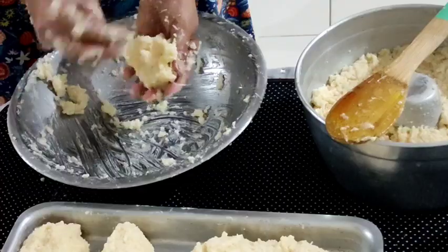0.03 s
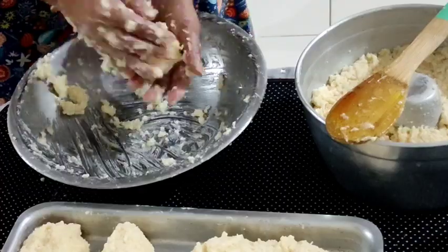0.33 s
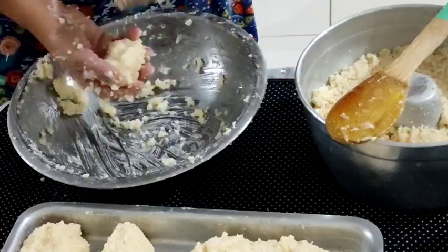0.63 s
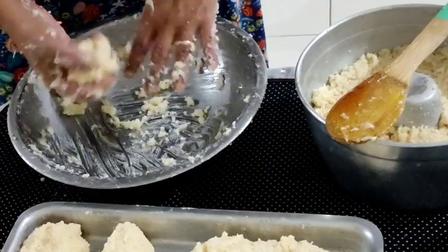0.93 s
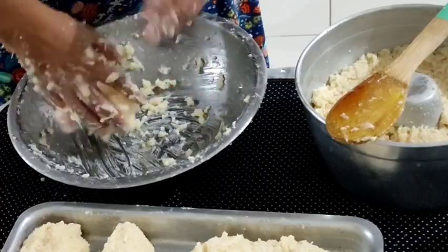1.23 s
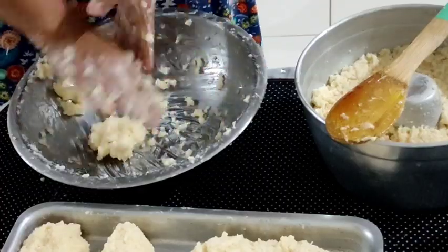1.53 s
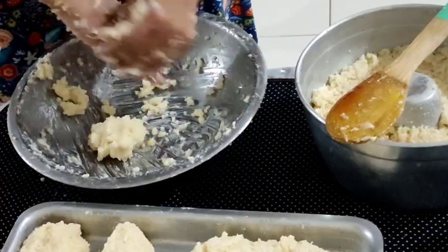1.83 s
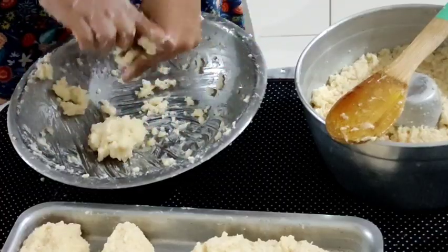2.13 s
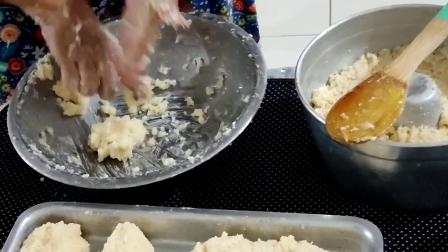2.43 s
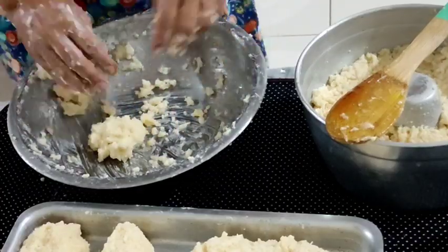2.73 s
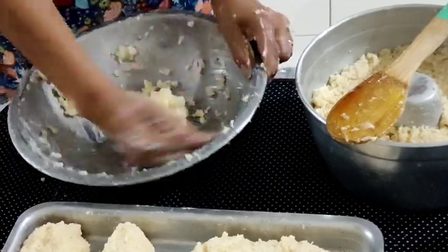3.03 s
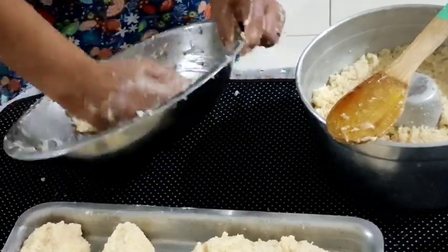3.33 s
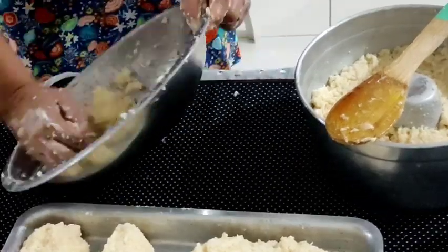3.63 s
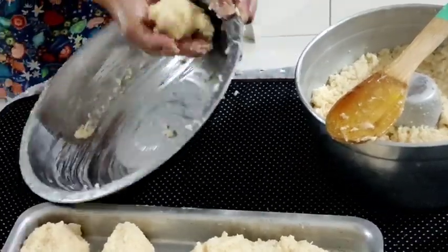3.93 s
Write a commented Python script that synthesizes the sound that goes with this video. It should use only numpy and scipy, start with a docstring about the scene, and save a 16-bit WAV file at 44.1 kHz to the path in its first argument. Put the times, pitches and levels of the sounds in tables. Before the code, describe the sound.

Sticky dough peels off hands in faint, crisp, wet ticks throughout, close up, with a few soft pats on a metal bowl. The rim clinks sharply at about 1.8 seconds. At 2.7 seconds a lump slaps in and squelches, ringing the metal briefly. Around 3 seconds the bowl drags and tips with a dull knock, then fingers wipe it until the end. An appliance hums steadily in the quiet kitchen.

```python
"""Sticky dough crackles off the skin over an appliance's hum, close to a stereo pair in a quiet kitchen.
Threads of dough part in tiny ticks; fingers wipe, pat and skid on a metal bowl, and its rim clinks once.
A lump slaps in, squelches flat and sets the metal ringing. The bowl is dragged and tipped up with a soft
knock, and sings faintly under the hand while it is wiped."""
import sys
import numpy as np
from scipy import signal
from scipy.fft import rfft, irfft
from scipy.io import wavfile

SR = 44100
rng = np.random.default_rng(int(sys.argv[2]) if len(sys.argv) > 2 else 0)


def wav_out(sig):
    """Save sig, one row per channel (or a flat mono array), as 16-bit PCM at SR to the path in sys.argv[1]."""
    wavfile.write(sys.argv[1], SR, np.round(np.clip(np.atleast_2d(sig).T, -1, 1) * 32767).astype(np.int16))


N = 176400
T = np.arange(N) / SR

# Table levels are relative: each source sets its own gain.
# kitchen reverberation: (frequency [Hz], t60 [s])
KITCHEN_T60 = [(200, 0.18), (1000, 0.21), (3000, 0.21), (8000, 0.13), (15000, 0.16)]
# spectrum of the room tone: (frequency [Hz], level [dB])
AIR_COLOUR = [(15, -49), (25, -28.5), (102, -6.5), (249, -8), (451, -8), (489, -9.5), (677, -12),
              (1040, -17.5), (1560, -20.5), (1890, -25.5), (2350, -27), (2610, -29), (3920, -33),
              (6560, -33.5), (8140, -40), (12900, -37.5), (16000, -40.5)]
# how alike the room tone is at the two microphones: (frequency [Hz], likeness [0-1])
AIR_LIKENESS = [(40, 0.64), (125, 0.54), (300, 0.62), (470, 0.72), (900, 0), (2000, 0), (12000, 0)]
# tones of the appliance: (frequency [Hz], level [dB], width [Hz], steady share [0-1])
HUM_TONES = [(130.7, -60, 17.6, 0.1), (183.4, -61.5, 43, 0.19), (319, -63, 16.6, 0.07),
             (360.3, -60.5, 12, 0.9), (440, -47, 37, 0.97), (681, -66, 6.3, 1), (2303, -73.5, 49, 0.47),
             (3855, -73, 82, 0.54)]
# course of a hollow band in the room tone: (time [s], level [dB])
HOLLOW_LEVELS = [(0, -57), (0.8, -59.5), (1.9, -59.5), (2.4, -55.5), (2.8, -52), (3.3, -60), (4, -61)]
# dough peeling off the skin: (peak time [s], rise [s], fall [s], level [dB], pitch [Hz])
DOUGH_PEELS = [(0.005, 0.012, 0.012, -57, 11300), (0.105, 0.019, 0.059, -60, 12500),
               (0.175, 0.028, 0.011, -58, 10300), (0.24, 0.01, 0.016, -58.5, 11900),
               (0.295, 0.0087, 0.04, -56.5, 11300), (0.44, 0.011, .015, -65, 11100),
               (0.495, 0.027, 0.035, -52, 11400), (0.754, .009, 0.013, -49, 12500),
               (0.809, 0.019, 0.014, -50, 9940), (0.848, .01, 0.012, -60, 9800),
               (1.085, .003, 0.012, -61, 12900), (1.235, 0.04, 0.031, -60, 10800),
               (1.29, 0.012, 0.0048, -55, 11300), (1.432, 0.011, 0.038, -55.5, 12700),
               (1.472, 0.016, 0.049, -56, 10500), (1.615, 0.012, 0.027, -57.5, 11700),
               (1.66, 0.013, 0.015, -47.5, 10600), (1.735, 0.016, 0.035, -53.5, 10800),
               (2.0, 0.039, 0.021, -58, 10500), (2.18, 0.024, 0.03, -60, 11800),
               (2.362, .003, 0.0074, -59, 12000), (2.452, 0.036, 0.018, -55, 11500),
               (2.636, 0.0048, 0.013, -63, 11900), (2.959, 0.016, 0.0093, -48.5, 11000),
               (3.13, 0.03, 0.03, -55, 11700), (3.275, 0.027, 0.029, -50.5, 11200),
               (3.96, 0.037, 0.017, -58.5, 11200)]
# spectrum of the peeling: (frequency [Hz], level [dB])
PEEL_SPECTRUM = [(1500, -4.5), (3000, 0), (5000, -9.5), (7400, 2.5), (9000, 1), (11700, 1), (13500, -3),
                 (16000, -0.5)]
# larger threads, air pockets and catches of the fingers: (time [s], level [dB], pitch [Hz])
SINGLE_SNAPS = [(0.096, -42, 12500), (0.1037, -38, 12100), (0.112, -42, 12300), (0.168, -49, 9000),
                (0.176, -49, 11600), (0.2917, -41, 11900), (0.4905, -43, 11700), (0.501, -48, 10800),
                (0.752, -35, 12200), (0.8031, -35, 9870), (1.083, -37.5, 13100), (1.2894, -38, 9050),
                (1.468, -38, 10600), (1.6535, -27, 10500), (1.661, -30, 10400), (2.362, -52, 12000),
                (2.44, -46, 11000), (2.6359, -40.5, 11900), (2.873, -43, 6200), (3.19, -33, 5100),
                (3.243, -38, 8350), (3.283, -38, 6300), (3.351, -35, 5300), (3.452, -45, 7000)]
# fingers wiping the greasy metal: (peak time [s], rise [s], fall [s], level [dB])
FINGER_WIPES = [(0.295, 0.0044, 0.079, -59.5), (1.47, 0.028, 0.023, -57.5), (1.64, 0.047, 0.034, -59),
                (2.46, 0.033, .04, -62.5), (2.873, 0.0049, 0.021, -59), (2.95, 0.062, 0.058, -52),
                (3.05, .03, 0.07, -60), (3.125, 0.078, 0.028, -49.5), (3.19, 0.012, 0.018, -48),
                (3.245, 0.035, 0.034, -51), (3.285, 0.017, 0.011, -51.5), (3.353, 0.0054, 0.037, -51),
                (3.41, 0.043, 0.058, -57), (3.455, 0.024, 0.0077, -46.5), (3.588, 0.026, 0.03, -50.5),
                (3.62, 0.018, 0.03, -54.5), (3.74, 0.077, 0.093, -54.5), (3.86, 0.057, 0.48, -60)]
# spectrum of the wiping: (frequency [Hz], level [dB])
WIPE_SPECTRUM = [(800, 9.5), (2000, -0.5), (3200, 2), (4700, 4), (6500, 5), (7600, 6), (9000, 4),
                 (12000, 1), (16000, -7.5)]
# soft blows of dough and fingers on the bowl: (time [s], level [dB], decay [s], low-pass [Hz])
SOFT_PATS = [(0.76, -48.5, 0.08, 1500), (1.233, -41, 0.0093, 1180), (1.286, -41, 0.01, 736),
             (2.715, -29, 0.0034, 700), (2.7217, -23.5, 0.01, 1900), (2.733, -34.5, 0.032, 1300),
             (2.884, -47, 0.066, 1220), (3.023, -34.5, 0.022, 1710), (3.077, -38.5, 0.009, 1090),
             (3.353, -41.5, 0.011, 600), (3.608, -46, 0.026, 1210)]
# spectrum of the pats: (frequency [Hz], level [dB])
PAT_SPECTRUM = [(50, -21), (150, -12), (300, -13), (430, 4), (590, 4.5), (800, -2), (1000, 6), (1500, -9),
                (3000, -6.5), (8000, -3.5), (16000, 0.5)]
# modes of the bowl with dough in it: (frequency [Hz], level [dB], t60 [s])
LOADED_BOWL_MODES = [(431, -5, 0.099), (533, -1, 0.16), (559, -9, 0.3), (584, -2, 0.34), (743, -11.5, 0.45),
                     (776, 4, 0.16), (915, 3, 0.11), (950, -5, 0.38), (987, 4, 0.17), (1110, -11, 0.23),
                     (1159, -13, 0.24), (1263, 0, 0.2), (1495, -3, 0.31), (1490, 10, 0.27)]
# a palm skidding on the bowl: (peak time [s], rise [s], fall [s], level [dB])
PALM_SKIDS = [(0.787, 0.011, 0.032, -49), (0.805, .006, 0.039, -51), (0.848, 0.008, .015, -56.5)]
# spectrum of the skids: (frequency [Hz], level [dB])
SKID_SPECTRUM = [(300, -26), (900, -0.5), (1400, 2), (2200, 3), (2900, -12), (4000, -4), (6000, -35),
                 (16000, -27)]
# dough squashed on the bowl: (peak time [s], rise [s], fall [s], level [dB])
DOUGH_SMEARS = [(0.79, 0.017, 0.042, -56), (1.293, 0.0043, 0.0042, -54), (2.573, 0.013, 0.006, -46),
                (2.747, 0.0067, 0.0072, -35), (2.757, 0.0054, 0.0039, -32),
                (2.764, 0.00084, 0.00094, -27.5), (2.778, .008, 0.045, -50)]
# spectrum of the squelch: (frequency [Hz], level [dB])
SMEAR_SPECTRUM = [(80, -33), (250, -15), (500, 1.5), (950, 4.5), (1600, -5), (2200, -7), (3000, -9),
                  (4000, -8.5), (4850, -3.5), (5700, -11.5), (7000, -5.5), (9500, -14), (16000, -21)]
# dough or palm landing flat on the metal: (time [s], level [dB], pulse width [s])
FLAT_SLAPS = [(1.2378, -42, 0.0004), (1.2418, -40.5, 0.00024), (1.2915, -35.5, 0.00048),
              (2.7238, -20, 0.00018), (2.7265, -25, 0.00019), (2.7293, -15, 0.00028), (2.748, -28, 0.00014),
              (2.7592, -23, 0.00044), (3.027, -30, 0.00027), (3.353, -43, 0.0003)]
# a hard tap on the rim and its bounces: (time [s], ring level [dB], crack level [dB], pan [dB])
RIM_TAPS = [(1.7536, -25.5, -11, -1), (1.7565, -36, -17, 7), (1.7628, -36.5, -32, -5)]
# modes of the hand-damped rim: (frequency [Hz], level [dB], t60 [s])
DAMPED_RIM_MODES = [(1220, -19, 0.03), (2550, -10, 0.028), (2750, -5, 0.028), (3050, 3.5, 0.013),
                    (3220, -14, 0.037), (3280, -7, 0.058), (3660, -17, 0.039), (3950, -7, 0.04),
                    (4200, -11, .045), (5500, -16, 0.03), (6640, -8, 0.029)]
# spectrum of the tap's crack: (frequency [Hz], level [dB])
CRACK_SPECTRUM = [(500, -26), (1300, -20), (2200, -6), (3100, 11.5), (4200, -3.5), (6000, 4), (8000, -11.5),
                  (11000, -9.5), (16000, -31)]
# tones of the lifted bowl: (frequency [Hz], level [dB], width [Hz])
SINGING_TONES = [(765, -59.5, 18), (678, -66, 20), (834, -69, 25), (1017, -75, 29)]
# the bowl dragged and tipped: (peak time [s], rise [s], fall [s], level [dB])
BOWL_DRAGS = [(3.02, 0.068, 0.049, -52), (3.19, 0.048, 0.17, -55.5)]
# spectrum of the drag's rumble: (frequency [Hz], level [dB])
DRAG_SPECTRUM = [(40, -27), (90, -12), (125, 19), (170, -14), (260, -7), (600, -27), (2000, -43),
                 (8000, -80)]
# the bowl's bottom knocking on the table: (time [s], level [dB])
TABLE_KNOCKS = [(3.076, -40.5), (3.101, -39.5)]
# low modes rung by a knock: (frequency [Hz], level [dB], t60 [s])
TABLE_KNOCK_MODES = [(78, -13, .09), (123, -1.5, 0.33), (138, 1.5, .17), (168, -6, 0.12), (235, -12, 0.047)]
# treble peak and dip of the left microphone: (frequency [Hz], gain [dB], Q [ratio])
LEFT_MIC = [(11700, 8, 10), (7840, -20, 4.5)]
# treble peak and dips of the right microphone: (frequency [Hz], gain [dB], Q [ratio])
RIGHT_MIC = [(9050, 11, 15.4), (10500, -5.5, 2.9), (7360, -17, 24)]


def from_db(db):
    """Decibels to gain."""
    return 10 ** (np.asarray(db) / 20)


def unit_rms(x):
    """Scale to unit rms."""
    return x / np.sqrt(np.mean(x ** 2) + 1e-20)


def at_hz(points, hz):
    """Read a table on a log-frequency axis."""
    freqs, values = np.transpose(points)
    return np.interp(np.log(np.maximum(hz, 1)), np.log(freqs), values)


def butter(x, order, hz, kind):
    """Butterworth filter."""
    return signal.sosfilt(signal.butter(order, hz, kind, fs=SR, output="sos"), x + 1e-18)


def colour(x, spectrum, size=4096):
    """Minimum-phase filter with the given spectrum; white noise keeps its power."""
    gain = unit_rms(from_db(at_hz(spectrum, np.fft.rfftfreq(size, 1 / SR))))
    cepstrum = irfft(np.log(gain))[:size // 2]
    cepstrum[1:] *= 2
    response = irfft(np.exp(rfft(cepstrum, size)))
    return np.apply_along_axis(lambda channel: signal.fftconvolve(channel, response)[:N], -1, x)


def ring(x, hz, t60):
    """One mode: a unit click starts a dying sine of height 1."""
    radius, angle = from_db(-60 / (t60 * SR)), 2 * np.pi * hz / SR
    return signal.lfilter([0, np.sin(angle)], [1, -2 * radius * np.cos(angle), radius ** 2], x + 1e-18)


def click(time, db):
    """One impulse."""
    return from_db(db) * (np.arange(N) == int(time * SR))


def pair(mid, side, alike):
    """Mid and side to left and right, with a likeness from 0 to 1."""
    return (np.sqrt(1 + alike) * mid + np.sqrt(1 - alike) * side * np.array([[1], [-1]])) / np.sqrt(2)


def pan(db):
    """Channel gains for a left-minus-right level."""
    return from_db(np.array([[db], [-db]]) / 2)


def narrow_noise(hz, width_hz):
    """A wavering tone: noise twice through one resonance."""
    detuning = 2 * (np.fft.rfftfreq(N, 1 / SR) - hz) / width_hz
    return unit_rms(irfft(rfft(rng.standard_normal(N)) / (1 + detuning ** 2), N))


def flutter(per_s):
    """A wobble gliding between random values of unit spread."""
    knots = rng.standard_normal(N // 20)
    return np.interp(T * per_s, np.arange(len(knots)), knots)


def grains(per_s, spread_db):
    """Tiny random snaps of uneven size."""
    sizes = from_db(spread_db * np.minimum(rng.exponential(1, N), 4))
    fires = rng.random(N) < per_s / SR
    return unit_rms(fires * sizes * rng.choice([-1, 1], N))


def swells(gestures):
    """Envelope in which each gesture builds to its peak and dies away."""
    power = 0
    for peak, rise, fall, db, *_ in gestures:
        fade = np.where(T < peak, ((T - peak) / rise) ** 2, (T - peak) / fall)
        power = power + from_db(db) ** 2 * np.exp(-2 * fade)
    return np.sqrt(power)


def kitchen(x, room_db, build_s=0.001):
    """Direct sound plus the room's short tail, different at each microphone."""
    t = T[:SR // 2]
    edges_hz = np.geomspace(80, 18000, 8)
    tail = 0
    for low, high in zip(edges_hz, edges_hz[1:]):
        band = butter(rng.standard_normal((2, len(t))), 2, [low, high], "band")
        tail = tail + band * from_db(-60 * t / at_hz(KITCHEN_T60, np.sqrt(low * high)))
    onset = 1 - np.exp(-(t / build_s) ** 2)
    response = from_db(room_db) * unit_rms(tail * onset) / np.sqrt(len(t))
    return x + signal.fftconvolve(x * np.ones((2, 1)), response, axes=1)[:, :N]


def in_bowl(x, echo_db, decay_s, spots=5):
    """Each snap comes from a spot with its own path to the pair and its own reflections off the metal."""
    spot, t = rng.integers(0, spots, N), T[:SR // 20]
    out = 0
    for k in range(spots):
        reflections = unit_rms(rng.standard_normal((2, len(t))) * np.exp(-t / decay_s))
        response = from_db(echo_db) * reflections / np.sqrt(len(t))
        response[0, spots] += 1  # direct paths: the delay between left and right places the spot
        response[1, 1 + 2 * k] += 1
        out = out + signal.oaconvolve(np.atleast_2d(x * (spot == k)), response, axes=1)[:, :N]
    return out / np.sqrt(1 + from_db(echo_db) ** 2)


def room_tone():
    """A soft rush of air, wider in the treble than in the bass."""
    mid, side = rfft(rng.standard_normal((2, N)))
    likeness = at_hz(AIR_LIKENESS, np.fft.rfftfreq(N, 1 / SR))
    air = irfft(pair(mid, side, likeness), N)
    return from_db(-50.5) * colour(air, AIR_COLOUR)


def appliance_hum(waver_hz=1.514):
    """An appliance hums mid-image, each tone part wavering sine and part narrow noise."""
    out = 0
    for hz, db, width, steady in HUM_TONES:
        cycles = np.cumsum(hz + waver_hz * flutter(12)) / SR + rng.random()
        tone = np.sqrt(steady) * np.sin(2 * np.pi * cycles)
        tone += np.sqrt(1 - steady) * narrow_noise(hz, width)
        out = out + from_db(db) * pair(tone, narrow_noise(hz, width), alike=0.99)
    return out


def hollow_rush(hz=788, width_hz=243):
    """A hollow band in the background swells a little and recedes."""
    band = pair(narrow_noise(hz, width_hz), narrow_noise(hz, width_hz), alike=0.19)
    return from_db(np.interp(T, *np.transpose(HOLLOW_LEVELS))) * band


def wet_ticks(threads, t60_cycles=22, spread_octaves=0.2):
    """Each parting thread rings briefly, at a pitch scattered around that of its peel."""
    pitches = np.geomspace(6000, 15000, 14)
    peels = np.array(DOUGH_PEELS)
    peel_hz = np.interp(T, peels[:, 0], peels[:, -1])
    thread_hz = peel_hz * 2 ** (spread_octaves * rng.standard_normal(N))
    nearest = np.digitize(thread_hz, np.sqrt(pitches[1:] * pitches[:-1]))
    ticks = sum(ring(threads * (nearest == k), hz, t60_cycles / hz) for k, hz in enumerate(pitches))
    return unit_rms(ticks) * np.std(threads)


def peeling():
    """Bright wet crackle of threads of dough letting go of the skin in clumps."""
    threads = grains(per_s=1100, spread_db=5.2) * swells(DOUGH_PEELS) * from_db(3.9 * flutter(220))
    ticks = in_bowl(wet_ticks(threads), echo_db=1.5, decay_s=0.004)
    return from_db(-3.5) * pan(0.61) * kitchen(colour(ticks, PEEL_SPECTRUM), room_db=-1.5)


def snaps(t60_cycles=14.4):
    """A larger thread parts or an air pocket bursts: one thin, crisp tick."""
    ticks = sum(ring(click(time, db), hz, t60_cycles / hz) for time, db, hz in SINGLE_SNAPS)
    ticks = in_bowl(butter(ticks, 2, 4500, "high"), echo_db=3, decay_s=0.0025, spots=1)
    return from_db(4) * pan(1.5) * kitchen(ticks, room_db=-6)


def wiping():
    """Gritty, uneven stick and slip of fingers on the buttered metal."""
    slips = grains(per_s=2200, spread_db=3.8) * swells(FINGER_WIPES) * from_db(3.5 * flutter(130))
    slips = in_bowl(slips, echo_db=7.5, decay_s=0.0032)
    return from_db(-2.05) * pan(-0.53) * kitchen(colour(slips, WIPE_SPECTRUM), room_db=-4.5)


def struck_bowl(contact, ring_db):
    """A contact together with the damped ring of the metal."""
    modes = sum(from_db(db) * (-1) ** k * ring(contact, hz, t60)
                for k, (hz, db, t60) in enumerate(LOADED_BOWL_MODES))
    return contact + from_db(ring_db) * modes


def pats():
    """Each soft blow on the bowl is a short, dull run of tiny contacts."""
    blows = 0
    for time, db, decay, cutoff_hz in SOFT_PATS:
        envelope = (T >= time) * np.exp(-np.abs(T - time) / decay)
        contacts = butter(grains(per_s=6600, spread_db=2.0) * envelope, 2, cutoff_hz, "low")
        onset_rms = np.sqrt(2 * np.sum(contacts ** 2) / (decay * SR) + 1e-20)
        blows = blows + from_db(db) * contacts / onset_rms
    blows = in_bowl(blows, echo_db=-3.5, decay_s=0.013, spots=1)
    blows = struck_bowl(blows, ring_db=-61)
    return from_db(-3.5) * kitchen(colour(blows, PAT_SPECTRUM), room_db=-14.5)


def skidding():
    """A palm judders over the metal in separate little slips, coarse and mid-pitched."""
    slips = grains(per_s=470, spread_db=2.5) * swells(PALM_SKIDS)
    slips = in_bowl(slips, echo_db=7.5, decay_s=0.0013)
    return kitchen(colour(slips, SKID_SPECTRUM), room_db=-10)


def smearing():
    """A dense, wet squelch as dough is squashed flat."""
    squelch = grains(per_s=6800, spread_db=2.0) * swells(DOUGH_SMEARS)
    squelch = in_bowl(squelch, echo_db=0.5, decay_s=0.0051)
    return pan(-0.1) * kitchen(colour(squelch, SMEAR_SPECTRUM), room_db=-2)


def slaps():
    """Air squeezed from under dough or palm as it lands: one push and pull of pressure each time."""
    pressure = 0
    for time, db, width in FLAT_SLAPS:
        lead = (time - T) / width
        pressure = pressure + from_db(db) * lead * np.exp((1 - lead ** 2) / 2)
    pressure = butter(pressure, 4, 380, "high")
    return from_db(-3.5) * kitchen(struck_bowl(pressure, ring_db=-51.5), room_db=-5.5)


def crack(time, db, chatter_db=-17, chatter_s=0.00052):
    """A hard contact: one sharp tick, then an instant of chatter."""
    chatter = rng.standard_normal((2, N)) * (T > time) * np.exp(-np.abs(T - time) / chatter_s)
    burst = colour(click(time, 0) + from_db(chatter_db) * chatter, CRACK_SPECTRUM)
    return from_db(db) * burst / np.linalg.norm(burst, axis=1, keepdims=True)


def rim_shimmer(hit, band_hz=(2590, 4170), t60=0.27):
    """The rim's many close modes merge into a dense, quickly dying ring."""
    t = T[:SR // 4]
    band = unit_rms(butter(rng.standard_normal((2, len(t))), 3, band_hz, "band"))
    return signal.fftconvolve(hit[None], band * from_db(-60 * t / t60), axes=1)[:, :N]


def clink():
    """Something hard taps and bounces: sharp cracks and the short ring of the hand-damped rim."""
    first_tap = click(*RIM_TAPS[0][:2])
    out = from_db(-20) * rim_shimmer(first_tap)
    for time, ring_db, crack_db, pan_db in RIM_TAPS:
        hit = click(time, ring_db)
        modes = sum(from_db(db) * rng.choice([-1, 1]) * ring(hit, hz, t60)
                    for hz, db, t60 in DAMPED_RIM_MODES)
        out = out + pan(pan_db) * (from_db(-5) * modes + from_db(3.5) * crack(time, crack_db))
    out[0] = np.roll(out[0], 4)  # reaches the left microphone 4 samples later
    return kitchen(out, room_db=-7.5, build_s=0.0018)


def singing_bowl(lift_s=2.75, rise_s=0.54):
    """Once lifted, the bowl rings faintly under the hand, dead centre."""
    tones = sum(from_db(db) * pair(narrow_noise(hz, width), narrow_noise(hz, width), alike=1)
                for hz, db, width in SINGING_TONES)
    return tones * np.clip((T - lift_s) / rise_s, 0, 1)


def dragging():
    """The bowl's bottom shudders over the tablecloth with a low rumble."""
    shudder = grains(per_s=1300, spread_db=19.0) * swells(BOWL_DRAGS)
    return kitchen(colour(shudder, DRAG_SPECTRUM), room_db=-10)


def table_knock():
    """A dull, padded double knock on the table as the bowl tips."""
    hits = butter(sum(click(time, db) for time, db in TABLE_KNOCKS), 2, [90, 400], "band")
    return sum(from_db(db) * ring(hits, hz, t60) for hz, db, t60 in TABLE_KNOCK_MODES)


def scene():
    """Hands and bowl up close, the kitchen behind them."""
    hands = peeling() + snaps() + wiping() + smearing() + skidding() + pats() + slaps()
    bowl = clink() + singing_bowl() + dragging() + table_knock()
    return hands + bowl + room_tone() + appliance_hum() + hollow_rush()


def microphone(x, resonances):
    """One microphone's opening adds narrow peaks and dips."""
    for hz, db, q in resonances:
        x = x + (from_db(db) - 1) * signal.lfilter(*signal.iirpeak(hz, q, fs=SR), x)
    return x


def record(dry):
    """Each microphone of the pair colours the treble; the top of the band is cut steeply."""
    cutoff_hz = 15850
    heard = np.array([microphone(dry[0], LEFT_MIC), microphone(dry[1], RIGHT_MIC)])
    return signal.sosfilt(signal.ellip(12, 0.1, 80, cutoff_hz, fs=SR, output="sos"), heard)


dry = scene()
out = record(dry)
wav_out(out)
```